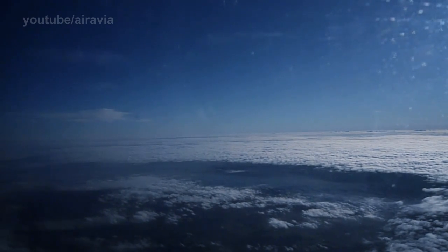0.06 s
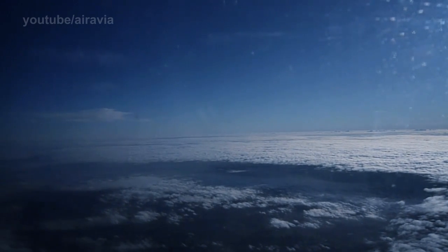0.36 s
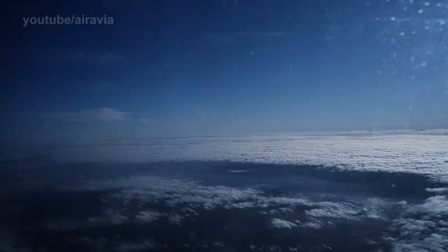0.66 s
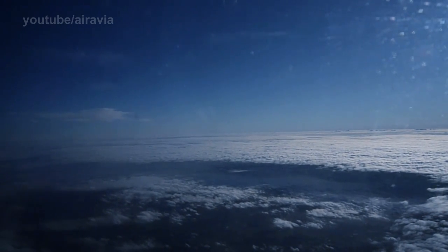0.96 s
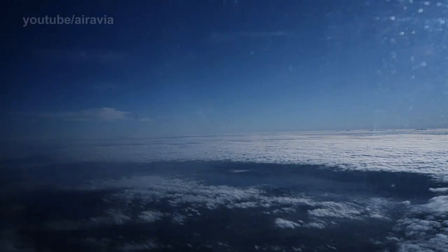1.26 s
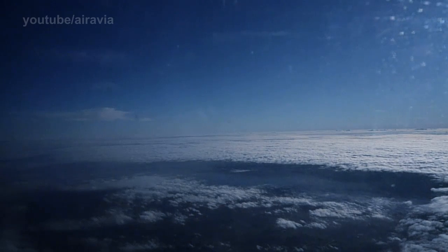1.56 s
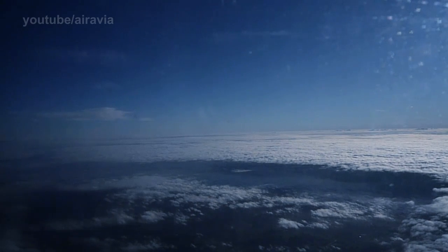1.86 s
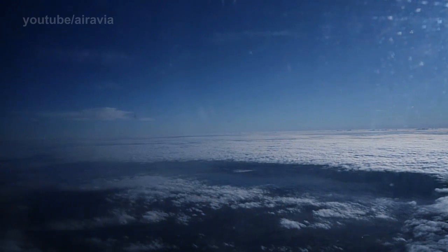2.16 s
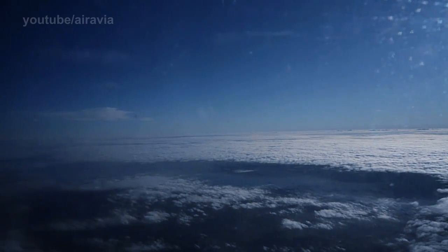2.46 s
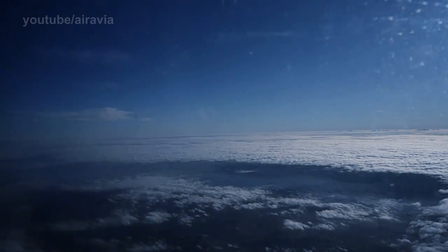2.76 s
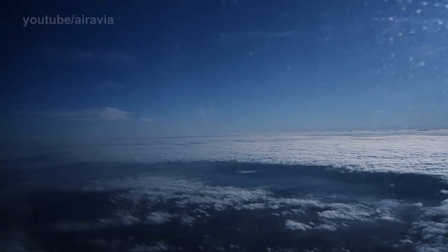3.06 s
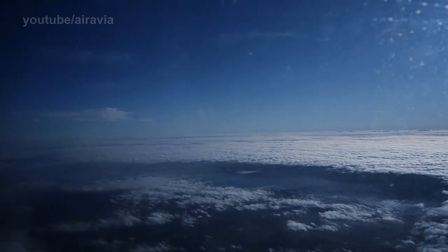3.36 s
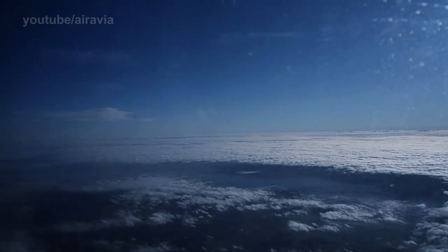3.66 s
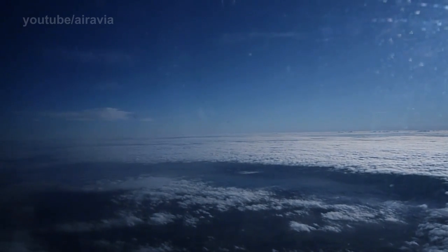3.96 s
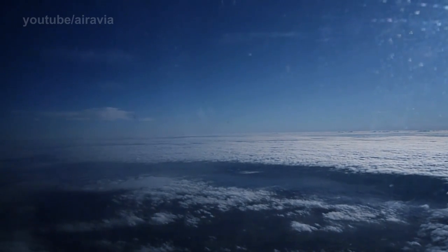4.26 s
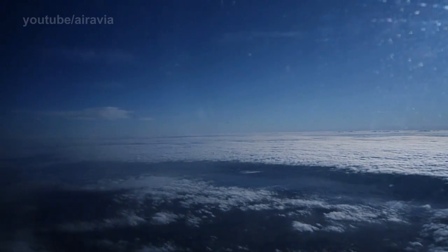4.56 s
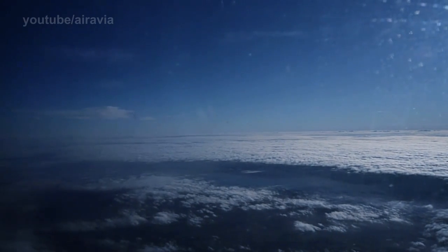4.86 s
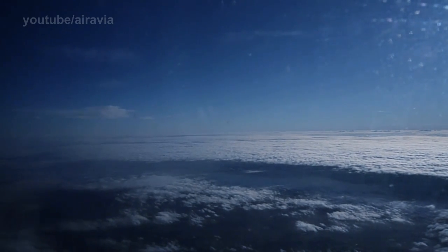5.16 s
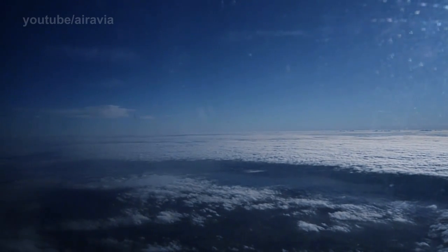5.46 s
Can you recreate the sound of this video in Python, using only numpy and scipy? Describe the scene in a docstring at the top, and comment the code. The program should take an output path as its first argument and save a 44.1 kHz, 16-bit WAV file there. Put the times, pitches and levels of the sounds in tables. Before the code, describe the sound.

Inside an airliner in flight, air rushes past with a steady, booming roar and a thin hiss on top. The jet engines hum with a slow, deep throb and a faint whine. A little past halfway, something close to the microphone is handled, giving a short scuff, a few light clicks and a soft rustle. The cabin noise dips slightly in level now and then.

```python
"""Airliner window seat at cruise

Air rushes along the outside of the plane, booms in the cabin and hisses with the air vents.
The engines hum and whine at multiples of their turning speed; two of them, slightly out of step,
make a slow throb. Something close by is handled: a short scuff, a soft rustle, a few light clicks.
The air and engines dip briefly in level now and then, and a limiter holds down the peaks."""
import sys
import numpy as np
from scipy import signal
from scipy.fft import rfft, irfft, next_fast_len
from scipy.io import wavfile
from scipy.ndimage import uniform_filter1d, minimum_filter1d

SR = 44100
rng = np.random.default_rng(int(sys.argv[2]) if len(sys.argv) > 2 else 0)


def persist_wave(psi):
    """Save psi, clipped to +-1, as 16-bit WAV."""
    counts = np.round(np.clip(psi, -1, 1) * 32767).astype(np.int16)
    wavfile.write(sys.argv[1], SR, np.atleast_2d(counts).T)


N = 247842


# Rushing air heard through the cabin wall: f/Hz, level/dB (per Hz)
RUSH_SPECTRUM = [(20, -91.5), (37, -89), (50, -77), (100, -67), (150, -61.5), (280, -63), (410, -65),
                 (520, -73), (720, -70), (950, -77), (1100, -79.5), (1350, -87.5), (1900, -102),
                 (3000, -125)]
# Pitches at which the cabin and wall panels ring: f/Hz, width/Hz, boost/dB
CABIN_RESONANCES = [(129.7, 21, 9), (331.7, 47, 5.5), (481.4, 35, 5), (590, 65, 4.5), (767, 47, 7),
                    (816.6, 94, 11.5)]
# Fine hiss of the airflow and the air vents: f/Hz, level/dB (per Hz)
HISS_SPECTRUM = [(500, -110), (1400, -89), (1900, -90), (2480, -90.5), (2660, -96.5), (2900, -97),
                 (3050, -100.3), (3930, -100.7), (4170, -108), (4420, -106.5), (4700, -109.5),
                 (5800, -111.7), (6800, -110.5), (7500, -115)]

def airflow(rush_flutter_db=0.68, hiss_flutter_db=0.62):
    """Swirling air on the plane's skin makes the cabin boom, with a thin hiss on top."""
    rush = noise(RUSH_SPECTRUM, CABIN_RESONANCES) * gain_of(rush_flutter_db * wander(43))
    hiss = noise(HISS_SPECTRUM) * gain_of(hiss_flutter_db * wander(25))
    return rush + hiss


# The two deepest tones: multiple of shaft speed, first engine level/dB, second engine level/dB
DRONE_TONES = [(1, -56, -53), (2, -49, -45.5)]
# Higher tones that hum: multiple of shaft speed, level/dB
HUM_TONES = [(3, -46), (4, -48), (5, -55), (6, -52.5), (10, -55), (11, -56.5), (12, -53), (13, -58.5)]
# The fan's whine: multiple of shaft speed, level/dB
WHINE_TONES = [(16, -64.5), (17, -68.5), (18, -68.5), (21, -70), (22, -65.5), (23, -75), (24, -71),
               (25, -68.5), (28, -85.5), (29, -81), (31, -81.5)]

def engines(shaft_hz=68.32, drift_hz=.015, whine_db=-0.2):
    """Shafts spinning at a nearly steady speed give a throbbing drone, a hum and a whine."""
    turns = np.cumsum(shaft_hz + drift_hz * wander(0.51)) / SR
    drone = sum(throb(multiple, first_db, second_db) * shaft_tone(multiple, turns, waver=0.037)
                for multiple, first_db, second_db in DRONE_TONES)
    hum = sum(gain_of(db) * shaft_tone(multiple, turns, waver=0.15) for multiple, db in HUM_TONES)
    whine = sum(gain_of(db) * shaft_tone(multiple, turns, waver=0.29) for multiple, db in WHINE_TONES)
    return (drone + hum + gain_of(whine_db) * whine).real


def shaft_tone(multiple, turns, waver):
    """One engine tone; unsteady air on its way to the ear shakes its strength and timing."""
    # A complex number holds both: its size is the strength, its angle the place in the cycle.
    times = np.linspace(0, N / SR, 30)
    real, imaginary = rng.standard_normal((2, len(times)))
    shake = np.interp(seconds(), times, 1 + waver * (real + 1j * imaginary)) / np.sqrt(1 + waver ** 2)
    return np.sqrt(2) * shake * np.exp(2j * np.pi * (multiple * turns + rng.random()))


def throb(multiple, first_db, second_db, faster_by_hz=0.293, weakest_at_s=2.91):
    """The second engine turns a little faster, so the two tones add up and partly cancel in turn."""
    lead_turns = faster_by_hz * (seconds() - weakest_at_s)
    return gain_of(first_db) - gain_of(second_db) * np.exp(2j * np.pi * multiple * lead_turns)


# Three quick rubs that make up the scuff: t/s, level/dB
SCUFF_TOUCHES = [(3.513, -3), (3.544, 1.5), (3.556, 4)]
# Tone colour of the scuff: f/Hz, level/dB (per Hz)
SCUFF_SPECTRUM = [(300, -80), (1000, -82), (1500, -75), (1900, -85), (2300, -80), (3300, -91), (3800, -86),
                  (4300, -95.5), (5500, -99), (6600, -99.5), (7500, -104)]

def scuff():
    """Something nearby rubs briefly as it is handled."""
    return touches(SCUFF_TOUCHES, SCUFF_SPECTRUM, rise_s=0.0039, fade_s=0.081)


# Light clicks: t/s, level/dB
CLICK_TOUCHES = [(3.371, -9), (4.251, -4.5), (4.363, -8), (4.589, 5)]
# Tone colour of a click: f/Hz, level/dB (per Hz)
CLICK_SPECTRUM = [(800, -100), (2300, -94), (3900, -100), (4450, -90), (4900, -102), (5800, -100),
                  (6350, -88.5), (6800, -100), (7500, -100)]

def clicks():
    """Light touches make sharp, bright ticks."""
    return touches(CLICK_TOUCHES, CLICK_SPECTRUM, rise_s=.0015, fade_s=.085)


# Tone colour of the rustle: f/Hz, level/dB (per Hz)
RUSTLE_SPECTRUM = [(300, -81), (1100, -77.5), (1800, -96), (2250, -86), (2600, -92), (2900, -88),
                   (3200, -92.5), (3700, -97), (4500, -101), (5600, -108), (6050, -104), (6900, -102),
                   (7500, -112)]

def rustle(start_s=4.25, swell_s=.24, hold_s=0.093, stop_s=.14, level_db=-0.5, grain_db=1.8):
    """One soft sliding stroke that gathers speed, catches unevenly and stops."""
    age = seconds() - start_s
    swell = np.clip(age / swell_s, 0, 1) ** 1.9
    stop = np.clip(1 - (age - swell_s - hold_s) / stop_s, 0, 1)
    catches = gain_of(level_db + grain_db * wander(120))
    return swell * stop * catches * noise(RUSTLE_SPECTRUM)


# Brief dips in level, of which air and engines each take a share: t/s, full depth/dB
LEVEL_DIPS = [(.12, 3), (.3, 2.5), (.61, 3), (1.21, 4), (1.739, 3.5), (2.07, 2), (3.085, 4.5), (3.64, 4.2),
              (4.9, 3.5), (5.1, 2), (5.55, 3)]

def dips(sink_s=0.028, recover_s=0.37, between_dips_db=1.08):
    """A volume curve that sinks quickly at each dip and creeps back up."""
    db = np.full(N, between_dips_db)
    for start_s, depth_db in LEVEL_DIPS:
        db -= depth_db * np.interp(seconds() - start_s, [0, sink_s, sink_s + recover_s], [0, 1, 0])
    return gain_of(db)


def touches(rows, spectrum, rise_s, fade_s):
    """Each touch is a burst of rubbing noise that rises fast, then falls 60 dB in fade_s."""
    loudness = np.zeros(N)
    for start_s, db in rows:
        age = np.maximum(seconds() - start_s, 0)
        rise = np.minimum(age / rise_s, 1)
        fade = np.exp(-np.log(1000) * np.maximum(age - rise_s, 0) / fade_s)
        loudness += gain_of(db) * rise * fade
    return loudness * noise(spectrum)


def noise(spectrum, resonances=()):
    """Noise with the given tone colour, boosted around each ringing pitch."""
    size = next_fast_len(N)
    hz = np.fft.rfftfreq(size, 1 / SR)
    points_hz, points_db = np.transpose(spectrum)
    db = np.interp(np.log(hz + 1), np.log(points_hz + 1), points_db)
    for centre, width, boost_db in resonances:
        db += boost_db * .5 ** ((2 * (hz - centre) / width) ** 2)
    white = rfft(rng.standard_normal(size))
    return irfft(white * gain_of(db), size)[:N] * np.sqrt(SR / 2)


def wander(rate_hz):
    """A smooth random wobble of typical size 1, moving at up to about the given rate."""
    size = next_fast_len(N)
    hz = np.fft.rfftfreq(size, 1 / SR)
    keep_slow = np.exp(-(hz / rate_hz) ** 2) * (hz > 0)
    wobble = irfft(rfft(rng.standard_normal(size)) * keep_slow, size)[:N]
    return wobble / (wobble.std() + 1e-12)


def gain_of(db):
    """Turn decibels into a number to multiply by."""
    return 10 ** (np.asarray(db) / 20)


def seconds():
    """The time of every sample."""
    return np.arange(N) / SR


def scene(air_dip_share=0.83, engine_dip_share=0.36):
    """Air and engines dip together, the air more deeply; the small sounds nearby are added on top."""
    volume = dips()
    handling = scuff() + clicks()
    cabin = volume ** air_dip_share * airflow() + volume ** engine_dip_share * engines()
    return (cabin + handling + rustle())[None]


def record(dry, ceiling=0.066, cutoff_hz=7620):
    """A limiter turns the sound down just ahead of each peak; then the highest treble is cut."""
    allowed = np.minimum(ceiling / (abs(dry[0]) + 1e-9), 1)
    gain = uniform_filter1d(minimum_filter1d(allowed, size=221), size=221)  # hold and smooth, 5 ms each
    lowpass = signal.firwin(401, cutoff_hz, window=("kaiser", 9), fs=SR)
    return signal.oaconvolve(dry * gain, lowpass[None], "same")


dry = scene()
out = record(dry)
persist_wave(out)
```